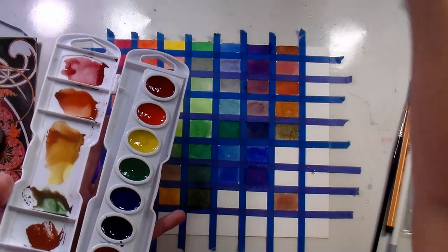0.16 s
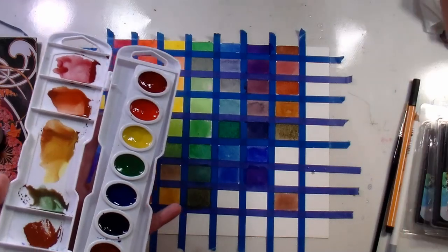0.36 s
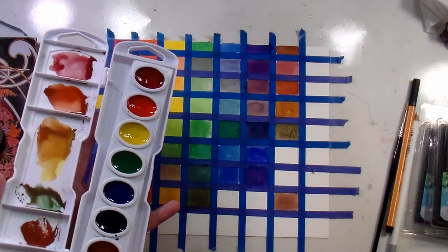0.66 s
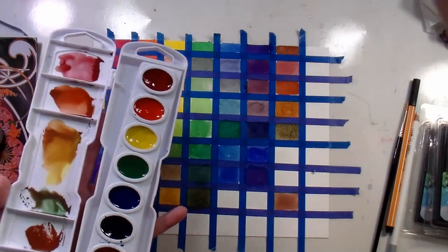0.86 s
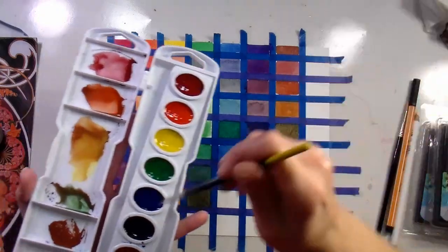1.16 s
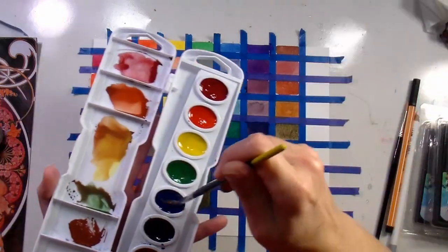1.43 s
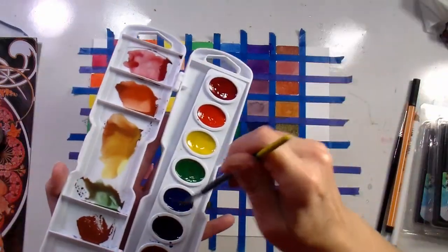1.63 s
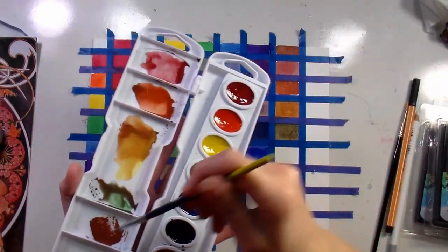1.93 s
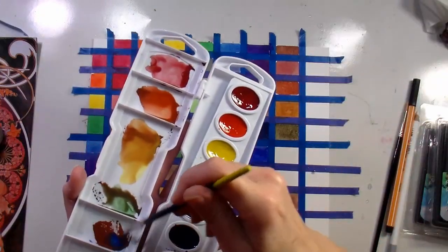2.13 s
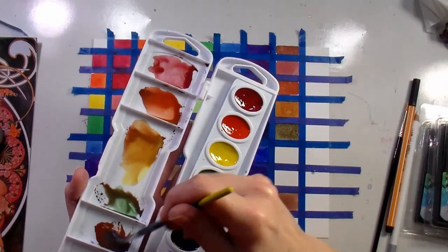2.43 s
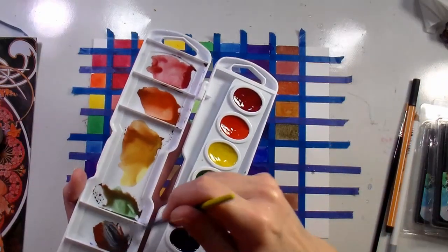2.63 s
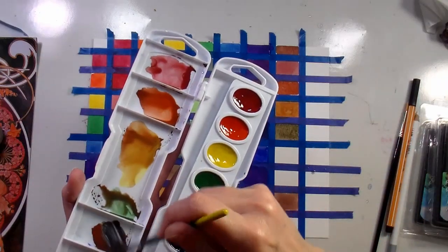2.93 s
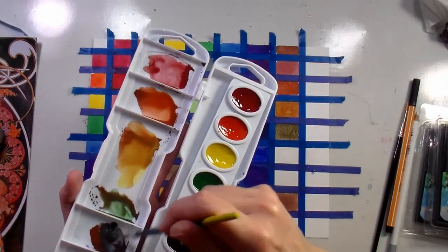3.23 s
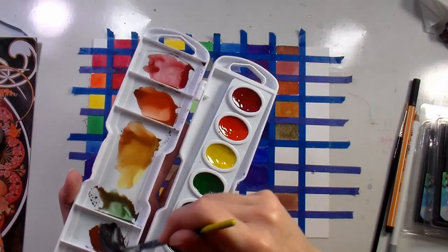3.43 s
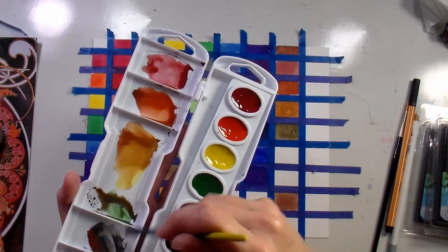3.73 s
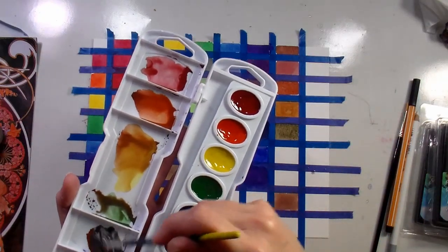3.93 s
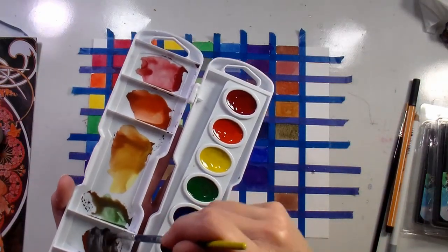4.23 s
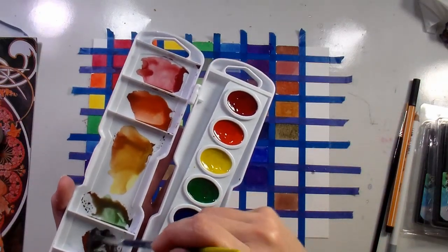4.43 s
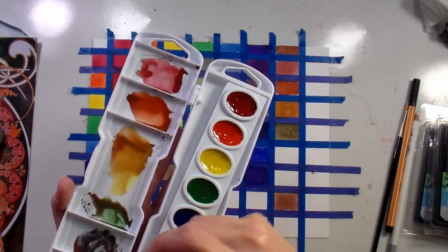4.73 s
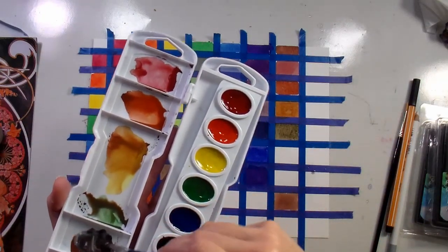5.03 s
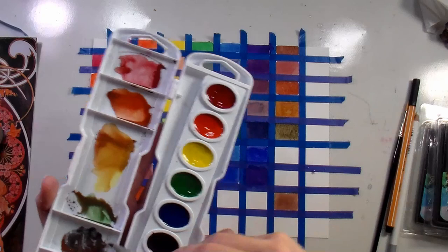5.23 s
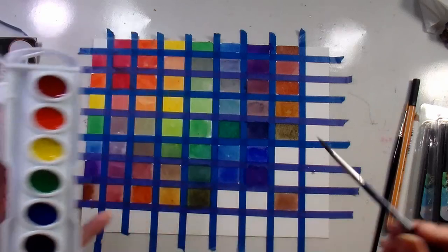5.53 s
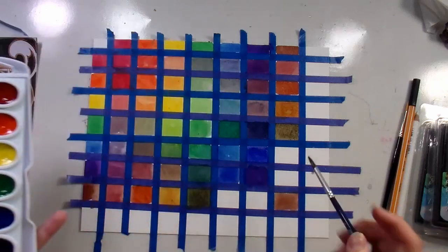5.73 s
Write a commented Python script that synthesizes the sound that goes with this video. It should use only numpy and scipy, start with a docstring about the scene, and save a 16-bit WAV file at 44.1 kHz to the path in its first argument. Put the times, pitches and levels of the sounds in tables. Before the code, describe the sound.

Clinking brush in a cup of water, one ringing rim tap, then soft scratchy circular strokes and small plastic ticks above a quiet electrical hum.

```python
"""Paintbrush in water and on a palette

A paintbrush is swished in a cup of water, knocks its wall and is tapped once on the rim.
Then the wet bristles mix watercolour in a hand-held plastic palette, which ticks under the strokes.
Cup and palette are sets of ringing tones, the water is many small bubbles, and the bristles are dense
tiny clicks. A small room, a low electrical hum and microphone hiss lie beneath.
"""
import sys
import numpy as np
from scipy import signal
from scipy.fft import rfft, irfft
from scipy.io import wavfile
from scipy.ndimage import uniform_filter1d

SR = 44100
rng = np.random.default_rng(int(sys.argv[2]) if len(sys.argv) > 2 else 0)


def log_audio(samples):
    """Write samples as a 16-bit WAV file to the path given in sys.argv[1]."""
    # one column per channel
    frames = np.atleast_2d(samples).T
    # limit to full scale, then quantise
    limited = np.clip(frames, -1, 1)
    pcm = np.round(limited * 32767).astype(np.int16)
    wavfile.write(sys.argv[1], SR, pcm)


N = 258426
TIME = np.arange(N) / SR
SIDES = np.array([[-1], [1]])  # left, right


def scene():
    """Cup, water, palette and brush sound in the room; hum and hiss are added to it."""
    return room(cup() + water() + palette() + brush()) + hum() + air()


def cup():
    """All blows on the cup, thinned in the bass, and the deeper knocks of its rocking."""
    blows = high_pass(wall_knocks() + rim_snap() + rim_tap(), hz=1140)
    return blows + cup_rocking()


# The brush knocks the cup wall under water:
# (time [s], level [dB], wall tone favoured by the spot [Hz], click level [dB])
KNOCKS = [(0.0361, -32.5, 1880, -53), (.103, -20, 1270, -48), (.114, -26.5, 1293, -74),
          (.129, -38, 1390, -57), (0.143, -34, 1470, -53), (.207, -23, 1295, -38),
          (0.2203, -23.5, 2032, -49), (.225, -21.5, 1466, -46), (.275, -21.5, 1550, -71),
          (.3169, -31, 1850, -59), (.336, -30, 1540, -30.5), (.399, -51, 1550, -65)]
# The upper tones grow with the click: level at a click of 0 dB, and growth in dB per dB
UPPER_DB, UPPER_PER_CLICK = -11, 0.45
# The upper region that knocks favour, and how fast the tones weaken on either side of it
UPPER_HZ, UPPER_DB_PER_OCTAVE = 3670, 13
LEANING_T60_S = 0.14  # the brush leaning on the wall: time to fall by 60 dB from this damping alone


def wall_knocks():
    """Knocks and rattles under water ring briefly, because the leaning brush damps the wall."""
    out = np.zeros((2, N))
    for s, db, wall_hz, click_db in list(KNOCKS) + rattles():
        upper_db = UPPER_DB + UPPER_PER_CLICK * click_db
        blow = cup_blow(db, wall_hz, click_db, upper_db, UPPER_HZ, UPPER_DB_PER_OCTAVE,
                        LEANING_T60_S, slosh=0.0092)
        add(out, s, blow)
    return out


# How hard the brush stirs, as the level of the water: (time [s], level [dB])
SWISH = [(0, -71), (.14, -51.5), (.2, -55.5), (.23, -40.5), (.345, -44.5), (.43, -75), (.55, -120)]
# The handle rattles lightly: touches per second, then touch and click level relative to the stirring
RATTLES_PER_S, RATTLE_DB, RATTLE_CLICK_DB = 39, 0, -14


def rattles(count=20):
    """Light touches at uneven moments and spots, harder as the stirring grows: rows like KNOCKS."""
    rows = []
    for k, (late, spot) in enumerate(rng.random((count, 2))):
        s = (k + late) / RATTLES_PER_S
        vigour_db = np.interp(s, *np.transpose(SWISH))
        wall_hz = np.interp(spot, [0, 1], [1200, 2000])
        rows.append((s, vigour_db + RATTLE_DB, wall_hz, vigour_db + RATTLE_CLICK_DB))
    return rows


SNAP_S, SNAP_DB = .3434, -14.5


def rim_snap(pan_db=2.0):
    """The metal collar of the brush snaps against the rim as it is lifted out: a noise burst."""
    out = np.zeros((2, N))
    add(out, SNAP_S, from_db(SNAP_DB + pan_db * SIDES) * crack(CRACK, t60=0.0077))
    return out


TAP_S, TAP_DB, TAP_WALL_HZ, TAP_CLICK_DB = .6065, -35.5, 1734, -24
TAP_UPPER_DB, TAP_UPPER_HZ, TAP_DB_PER_OCTAVE = -22, 6400, 11.5
TAP_T60_S = 7.4  # the brush hardly damps the rim
PING_DB, PING_HZ, PING_T60_S = -9, 6120, 0.0084


def rim_tap(pan_db=2.0):
    """One tap on the rim lets the cup ring freely, while the metal collar adds a very short ping."""
    out, t = np.zeros((2, N)), seconds(.2)
    add(out, TAP_S, cup_blow(TAP_DB, TAP_WALL_HZ, TAP_CLICK_DB, TAP_UPPER_DB, TAP_UPPER_HZ,
                             TAP_DB_PER_OCTAVE, TAP_T60_S, slosh=0.0022))
    ping = ring(t, PING_HZ, PING_T60_S) * (1 - np.exp(-t / 0.00068))
    add(out, TAP_S, from_db(PING_DB + pan_db * SIDES) * ping)
    return out


# The cup rocks on the table: (time [s], level [dB])
ROCKS = [(.253, -38.5), (.277, -37.5), (.305, -43.5), (.335, -40), (.609, -37)]


def cup_rocking():
    """Each rock of the cup on the table sounds one low tone that dies at once."""
    out, t = np.zeros((2, N)), seconds(.2)
    knock = ring(t, hz=680, t60=0.039) * (1 - np.exp(-t / 0.00042))
    for s, db in ROCKS:
        add(out, s, from_db(db) * knock)
    return out


# Tones of the cup and the brush handle: (pitch [Hz], relative level [dB], time to fall by 60 dB [s])
CUP = [(1293, 1.5, .15), (1542, 1, .11), (1733, 3, .62), (2031, 1, .1), (1215, -3, .04), (1342, -4, .1),
       (1440, -6, .12), (1824, -2, .09), (3120, -9, .05), (3270, -10, .07), (3640, -17, .06),
       (4150, -15, .05), (4800, -10, .06), (4930, -19, .18), (5066, -18, .15), (6010, -17, .19),
       (6083, -13, .15), (6160, -18, .17), (6272, -19, .18), (6444, -19, .17), (7246, -23, .08),
       (8856, -21, .13), (13310, -19, .07)]
# The cup is not quite round, so each tone has a weaker twin that beats with it
BEAT_HZ, TWIN_SHARE = 6.4, .36
CUP_PAN_DB = 1.5  # the cup stands to the right: tilt each way, in full from 6 kHz up


def cup_blow(db, wall_hz, click_db, upper_db, upper_hz, fall_db, damper_t60, slosh, rise_s=0.0012):
    """One blow favours one wall tone and one region of upper tones, by where it lands."""
    hz, mode_db, t60 = np.transpose(CUP)
    length = 1 / (1 / t60 + 1 / damper_t60)[:, None]  # both dampings together
    t = seconds(1.2 * length.max())
    chance = rng.standard_normal((2, len(hz)))
    short = hz >= 2600  # the upper tones feel the touch most
    detune = slosh * (1 + 1.48 * short) * chance[0]  # moving water detunes the wall
    pitch = (hz * (1 + detune))[:, None]
    modes = (1 - TWIN_SHARE) * ring(t, pitch, length)
    modes += TWIN_SHARE * ring(t, pitch + BEAT_HZ, length)
    modes *= 1 - np.exp(-t / rise_s)
    wall = db + np.maximum(-65 * np.abs(np.log2(hz / wall_hz)), -21)
    upper = upper_db - fall_db * np.abs(np.log2(hz / upper_hz)) + 3.3 * chance[1]
    strength = from_db(mode_db + np.where(short, upper, wall))
    pan = from_db(SIDES * CUP_PAN_DB * np.minimum(hz / 6000, 1) ** 2)
    out = (pan * mode_sides(hz, spread_db=3.0) * strength) @ modes
    add(out, 0, from_db(click_db) * crack(CRACK, t60=0.01))
    return out


def water():
    """Stirred-in bubbles, and drops that fizz off the hairs."""
    return bubbles() + spray()


# Loudness of bubbles by pitch: (pitch [Hz], relative level [dB])
SWISH_COLOUR = [(300, -22.5), (500, -8), (700, -15), (1000, -0.5), (1600, 18), (2050, 3), (2600, -4),
                (3500, -1), (4800, -4), (7000, -20), (14000, -10)]


def bubbles():
    """Stirring traps small bubbles, each ringing briefly and rising in pitch."""
    out, t = np.zeros(N), seconds(0.033)
    length = SWISH[-1][0]
    for when, size, strength in rng.random((1500, 3)):
        hz = 300 * 42 ** size
        bubble = ring(t * (1 + 0.63 * t), hz, 26 / hz) * (1 - np.exp(-t * hz))
        add(out, when * length, from_db(at_hz(SWISH_COLOUR, hz) - 14 * strength) * bubble)
    return out / np.std(out[TIME < length]) * in_time(SWISH)


# Spray grows with the click: level at a click of 0 dB, and growth in dB per dB
SPRAY_DB, SPRAY_PER_CLICK = -48, 0.33
SPRAY_DELAY_S, SPRAY_HALF_S = .03, 0.033


def spray():
    """Each contact flings drops off the bristles, heard as a swell of tiny clicks just after it."""
    contacts = [(s, click_db) for s, _, _, click_db in KNOCKS]
    contacts += [(SNAP_S, SNAP_DB), (TAP_S, TAP_CLICK_DB)]
    rows = [(s + SPRAY_DELAY_S, SPRAY_DB + SPRAY_PER_CLICK * click_db, SPRAY_HALF_S)
            for s, click_db in contacts]
    return swells(rows) * coloured(grains(per_s=5000, spread_db=0.0), CRACK, CLOSE_LIKENESS)


def brush():
    """Everything the bristles do on the palette, and the palette's slide at the end."""
    push = circling()
    strokes = push * rubbed(per_s=8000, spread_db=3.0, ringing_db=-3.5)
    return strokes + edge_catch() + singing(push) + wet_crackle() + hair_flicks() + palette_slide()


# The brush circles in the paint: (time of first push [s], time per circle [s], number of circles)
BOUTS = [(2.248, .172, 7), (3.47, .17, 7), (4.75, .16, 4)]
# Pressure on the brush, as the level of a push: (time [s], level [dB])
PRESSURE = [(2.2, -65), (2.42, -54.5), (2.6, -52), (2.9, -57), (3.29, -54.5), (3.46, -62.5), (3.97, -63),
            (4.145, -55), (4.72, -66), (5.07, -54.5), (5.25, -67)]
PUSH_HALF_S, RETURN_HALF_S, RETURN_DB = 0.018, 0.05, -11.5  # return level relative to the push


def circling():
    """Loudness of the strokes: a short push, then half a turn later a longer, lighter return."""
    strokes = []
    for first, period, circles in BOUTS:
        for s in first + period * np.arange(circles):
            db = np.interp(s, *np.transpose(PRESSURE))
            strokes.append((s, db, PUSH_HALF_S))
            strokes.append((s + period / 2, db + RETURN_DB, RETURN_HALF_S))
    return swells(strokes)


# Colour of the bristle noise: (pitch [Hz], relative level per Hz [dB])
BRISTLES = [(700, -27), (1900, -23), (2600, 0.5), (3400, 6.5), (4200, -2.5), (4950, 1.5), (5350, -5.5),
            (5850, -11), (6500, 1), (8000, -1.5), (9500, -1.5), (14000, -3)]


def rubbed(per_s, spread_db, ringing_db):
    """Tiny slips of the hairs, heard directly and through the palette's upper tones; rms 1."""
    t = seconds(.05)
    slips = grains(per_s, spread_db)
    tray = sum(from_db(db) * ring(t, hz, t60) for hz, db, t60 in PALETTE if hz > 2300)
    ringing = signal.fftconvolve(slips, tray[None], axes=1)[:, :N]
    tray_colour = [(1200, -9.5), (2400, -2), (4500, 3.5), (6000, 2), (14000, 0.5)]
    ringing = coloured(ringing, tray_colour, CLOSE_LIKENESS)
    direct = coloured(slips, BRISTLES, CLOSE_LIKENESS)
    return rms_one(direct + from_db(ringing_db) * ringing)


# Colour of the scrape: (pitch [Hz], relative level per Hz [dB])
CATCH_COLOUR = [(700, -14), (1900, -9), (2600, -0.5), (3600, -1.5), (5000, -9), (14000, -19)]
CATCH_S, CATCH_DB, CATCH_HALF_S = 3.157, -47, 0.0093


def edge_catch():
    """Once the bristles catch the edge of the well and scrape over it: a swell of coarse clicks."""
    scrape = coloured(grains(per_s=2500, spread_db=2.0), CATCH_COLOUR, CLOSE_LIKENESS)
    return swells([(CATCH_S, CATCH_DB, CATCH_HALF_S)]) * scrape


# Level at a push of SING_PUSH_DB, and growth in dB per dB of push
SING_DB, SING_PUSH_DB, SING_GROWTH = -58.5, -53, 2.2


def singing(push):
    """Firm pushes make one tone of the tray sing: slips set it off again and again."""
    slips = grains(per_s=9000, spread_db=2)
    sung = signal.fftconvolve(slips[0], ring(seconds(.05), hz=5880, t60=0.0094))[:N]
    return from_db(SING_DB) * (push / from_db(SING_PUSH_DB)) ** SING_GROWTH * rms_one(sung)


# Wet hairs crackle as the brush takes up paint and as it mixes:
# (start time [s], end time [s], level [dB])
WET = [(1.002, 1.15, -70), (2.4, 4.998, -68)]


def wet_crackle():
    """Wet paint crackles: sparse tiny slips that fade in and out."""
    level = sum(held(start, end, db, fade_db_per_s=24.5) for start, end, db in WET)
    return level * rubbed(per_s=1200, spread_db=3.5, ringing_db=-2.5)


# Single hairs flick off the edge of the paint pan: (time [s], level [dB])
FLICKS = [(1.296, -56), (1.785, -55)]


def hair_flicks(half_s=0.0033):
    """A flick is a very short swell of bright clicks."""
    clicks = coloured(grains(per_s=9000, spread_db=2), BRISTLES, CLOSE_LIKENESS)
    return swells([(s, db, half_s) for s, db in FLICKS]) * high_pass(clicks, hz=5500)


# Colour of the slide: (pitch [Hz], relative level per Hz [dB])
SLIDE_COLOUR = [(300, 0.5), (550, 0), (900, -16), (1200, 4), (1600, -2), (2400, 2.5), (4000, -2.5),
                (6000, 0), (8000, -19), (14000, -30)]


def palette_slide():
    """The palette slides aside at the end: dense rough clicks with quick fades."""
    level = held(start=5.78, end=5.86, db=-58, fade_db_per_s=100)
    return level * coloured(grains(per_s=9700, spread_db=4.0), SLIDE_COLOUR, CLOSE_LIKENESS)


# The palette ticks as it is gripped and pushed: (time [s], force level [dB], contact time [ms])
TICKS = [(.441, -42.5, 0.37), (.692, -47.5, 0.18), (2.336, -52, 0.23), (2.512, -45.5, 0.26),
         (2.67, -53.5, 0.19), (2.852, -46, 0.25), (3.046, -44, 0.075), (3.151, -48, 0.17),
         (3.184, -48.5, 0.23), (3.373, -48, 0.25), (3.884, -44.5, 0.24), (3.906, -45, 0.13),
         (4.074, -43.5, 0.28), (4.254, -42.5, 0.31), (4.448, -49, 0.38), (4.503, -45.5, .65),
         (4.547, -47, 0.3), (4.999, -46.5, 0.33), (5.111, -47.5, .26), (5.246, -48, 0.28),
         (5.398, -46.5, 0.28), (5.806, -56, .21)]
# Tones of the plastic palette: (pitch [Hz], relative level [dB], time to fall by 60 dB [s])
PALETTE = [(635, -4, 0.08), (806, -7, 0.068), (929, 0, 0.038), (1200, -5, 0.022), (1340, -18, 0.015),
           (1580, -16, 0.02), (2026, -8, 0.032), (2322, -6.5, 0.032), (2522, -1, 0.021), (2710, 0, 0.022),
           (3070, -2.5, 0.022), (3447, -8.5, 0.038), (3780, -10, 0.037), (4170, -5.5, 0.021),
           (5030, -11, 0.031), (5843, -0.5, 0.026), (6415, -9, 0.023), (6800, -7.5, 0.022),
           (9500, -3.5, 0.031), (10430, -8, 0.036), (12670, 7.5, 0.0085), (13400, 3, .015)]


def palette(bass_db=-5, body_db=-3.5, middle_db=2, snap_db=4, snap_hz=6200, steepness=8):
    """The plastic tray ticks; long, soft contacts wake only its low tones, short ones snap."""
    out, t = np.zeros((2, N)), seconds(.1)
    hz, mode_db, t60 = np.transpose(PALETTE)
    balance_db = at_hz([(600, bass_db), (950, body_db), (2300, middle_db)], hz)
    for s, db, contact_ms in TICKS:
        corner_hz = 1000 / contact_ms  # a contact hardly excites tones above this
        passed_db = -10 * np.log10(1 + (np.append(hz, snap_hz) / corner_hz) ** steepness)
        force_db = db + passed_db[:-1] + balance_db
        chance = rng.standard_normal((2, len(hz)))
        pitch = hz * (1 + np.clip(0.023 * chance[0], -.05, .05))  # the grip shifts the tones a little
        modes = ring(t, pitch[:, None], t60[:, None]) * (1 - np.exp(-t / 0.0016))
        strength = from_db(force_db + mode_db + 2.25 * chance[1])
        strength *= (-1) ** np.arange(len(hz))  # neighbouring tones start in opposite directions
        add(out, s, (mode_sides(hz, spread_db=4.5) * strength) @ modes)
        add(out, s, from_db(db + passed_db[-1] + snap_db) * crack(CRACK, t60=0.041))
    return out


# Colour of a hard contact: (pitch [Hz], relative level per Hz [dB])
CRACK = [(300, -41), (650, -32), (1000, 5), (1700, -2), (2700, -3), (5000, -1.5), (7500, 0.5), (10500, 0),
         (14000, -8)]
# How alike left and right are for close sounds: (pitch [Hz], likeness [0 to 1])
CLOSE_LIKENESS = [(500, 0.99), (2000, 0.99), (6000, 0.6), (14000, 0.17)]


def crack(spectrum, t60):
    """The brief noise burst of a contact."""
    t = np.arange(2048) / SR
    noise = coloured(rng.standard_normal((2, len(t))), spectrum, CLOSE_LIKENESS)
    return noise * from_db(-60 * t / t60)


# Echoes off the table and near walls: (delay time [s], level [dB])
ECHOES = [(.0037, -11), (0.0104, -10.5), (0.0215, -17)]


def room(x, tail_db=-13, t60=0.28):
    """A few near echoes, and a short blurred tail."""
    t = seconds(.4)
    tail_colour = [(300, 5.5), (2000, 7.5), (6000, 11.5), (14000, 4.0)]
    tail_likeness = [(500, 0.23), (3000, 0.97), (9000, .1)]
    tail = coloured(rng.standard_normal((2, len(t))), tail_colour, tail_likeness)
    tail = tail * from_db(-60 * t / t60) * (1 - np.exp(-t / 0.0033))
    response = from_db(tail_db) * rms_one(tail) / np.sqrt(len(t))
    for s, db in ECHOES:
        add(response, s, from_db(db) * np.array([1, 4, 1]) / 6)  # slightly softened echo
    return x + signal.fftconvolve(x, response, axes=1)[:, :N]


# Electrical hum, a pattern that repeats every fourth mains cycle:
# (multiple of a quarter of the mains rate, rms level [dB])
HUM = [(2, -54), (3, -68), (4, -51), (5, -74), (7, -79), (8, -57), (9, -101), (11, -89), (12, -72.5),
       (16, -66.5), (20, -80), (24, -90)]
MAINS_HZ = 59.97


def hum():
    """Steady mains tones, all in step so that they add up to a train of dips; same on both sides."""
    turns = MAINS_HZ / 4 * TIME + rng.random()
    return -sum(np.sqrt(2) * from_db(db) * np.cos(2 * np.pi * round(k) * turns) for k, db in HUM)


# Colour of room air and microphone hiss: (pitch [Hz], relative level per Hz [dB])
AIR = [(20, 4.5), (45, -2), (90, -6.5), (160, -9.5), (300, -14.5), (600, -16.5), (1000, -20), (1400, -22),
       (1660, -17.5), (2000, -23), (4000, -24.5), (8000, -26), (14000, -28)]
# How alike left and right are in the air: (pitch [Hz], likeness [0 to 1])
AIR_LIKENESS = [(60, 0.5), (130, 0.31), (290, 0.23), (640, 0.25), (1400, 0.27), (3080, 0.075),
                (6760, 0.024), (14900, 0.046)]
AIR_DB = -56  # rms level


def air():
    """Room air and microphone hiss: steady coloured noise."""
    return from_db(AIR_DB) * coloured(rng.standard_normal((2, N)), AIR, AIR_LIKENESS)


CUTOFF_HZ = 14500


def record(dry, threshold_db=-27, slope=0.19, release_db_per_s=9):
    """Gain control ducks a little at loud sounds and recovers slowly; the top is cut."""
    peak_db = 20 * np.log10(np.abs(dry).max(axis=0) + 1e-9)
    over_db = slope * np.maximum(peak_db - threshold_db, 0)
    recovery_db = release_db_per_s * TIME
    duck_db = np.maximum.accumulate(over_db + recovery_db) - recovery_db
    ducked = dry * from_db(-uniform_filter1d(duck_db, size=128))
    top_cut = signal.ellip(10, .2, 70, CUTOFF_HZ, fs=SR, output="sos")
    return signal.sosfilt(top_cut, ducked)


def from_db(db):
    """Turn decibels into a gain."""
    return 10 ** (np.asarray(db) / 20)


def seconds(length_s):
    """Sample times from zero up to a length."""
    return np.arange(int(length_s * SR)) / SR


def rms_one(x):
    """Scale a sound to an rms level of 1."""
    return x / np.sqrt(np.mean(x ** 2) + 1e-20)


def in_time(rows):
    """Gain along a curve of (time [s], level [dB])."""
    return from_db(np.interp(TIME, *np.transpose(rows)))


def at_hz(points, hz):
    """Read a table by pitch, on a log-frequency axis."""
    f, value = np.transpose(points)
    return np.interp(np.log(np.maximum(hz, 1)), np.log(f), value)


def swells(rows):
    """Gain of bell-shaped swells: (time [s], level [dB], half length [s])."""
    power = 0
    for s, db, half in rows:
        power = power + from_db(2 * db) * np.exp(-np.minimum(((TIME - s) / half) ** 2, 60))
    return np.sqrt(power)


def held(start, end, db, fade_db_per_s):
    """Gain that rises, holds from start to end and falls again."""
    distance_s = np.abs(TIME - np.clip(TIME, start, end))
    return from_db(db - fade_db_per_s * distance_s)


def coloured(white, spectrum, likeness):
    """Two unrelated noises become a stereo pair of given colour and likeness; rms 1."""
    size = white.shape[1]
    hz = np.arange(size // 2 + 1) * SR / size
    mid, side = rfft(white) * from_db(at_hz(spectrum, hz))
    alike = np.clip(at_hz(likeness, hz), -1, 1)
    pair = np.sqrt(1 + alike) * mid - np.sqrt(1 - alike) * side * SIDES
    return rms_one(irfft(pair, size))


def grains(per_s, spread_db):
    """Two rows of tiny clicks of uneven size at shared random moments."""
    sizes = from_db(spread_db * np.minimum(rng.exponential(1, N), 4))
    return rng.standard_normal((2, N)) * sizes * (rng.random(N) < per_s / SR)


def ring(t, hz, t60):
    """A struck tone that falls by 60 dB in t60 seconds."""
    return np.sin(2 * np.pi * hz * t) * from_db(-60 * t / t60)


def add(out, s, sound):
    """Mix a sound in at time s."""
    at = max(round(s * SR), 0)
    out[..., at:at + sound.shape[-1]] += sound[..., :N - at]


def mode_sides(hz, spread_db):
    """Short waves reach the two microphones with unequal strength."""
    tilt_db = spread_db * np.minimum(hz / 6000, 1) * rng.normal(0, 1, len(hz))
    return from_db(SIDES * tilt_db)


def high_pass(x, hz):
    """Thin out the sound below a given pitch."""
    return signal.sosfilt(signal.butter(4, hz, "high", fs=SR, output="sos"), x)


dry = scene()
out = record(dry)
log_audio(out)
```